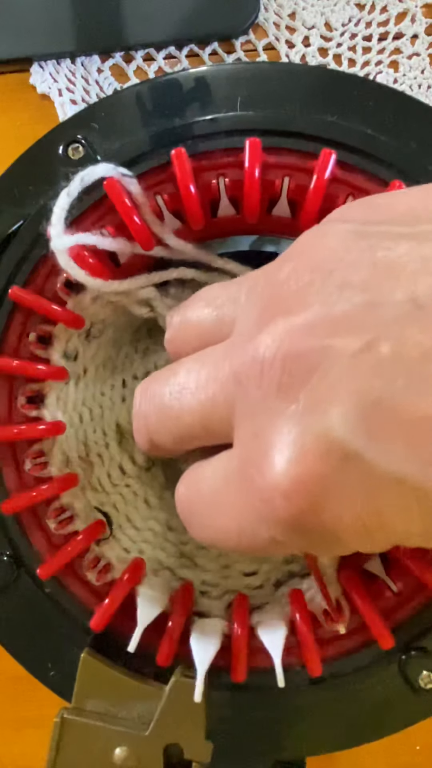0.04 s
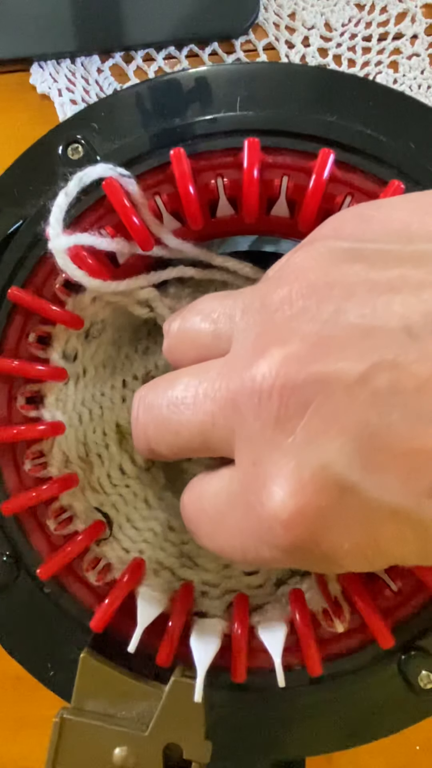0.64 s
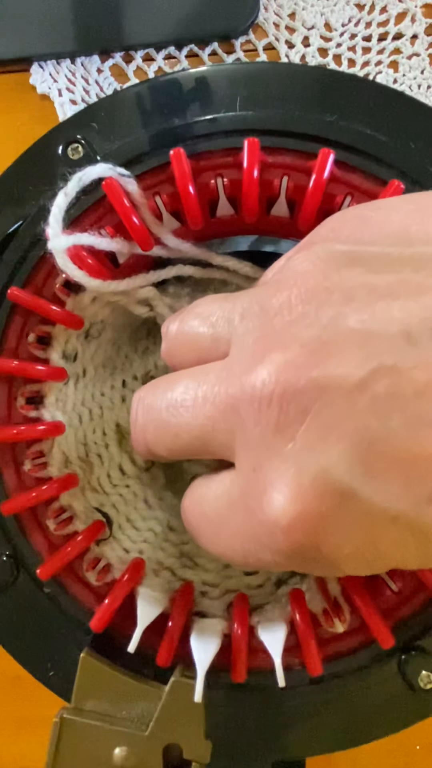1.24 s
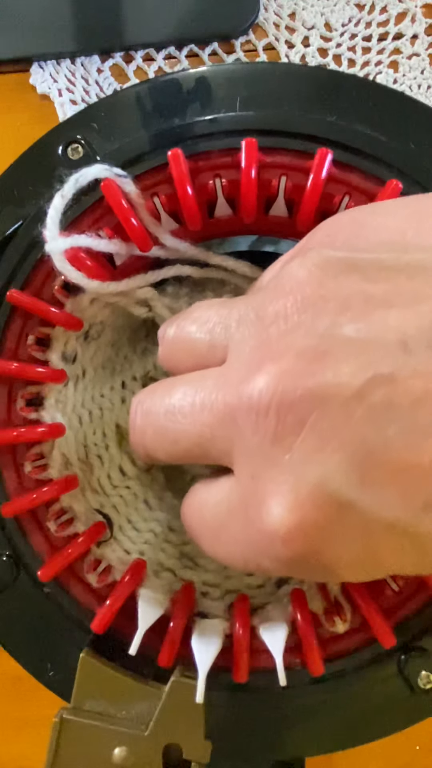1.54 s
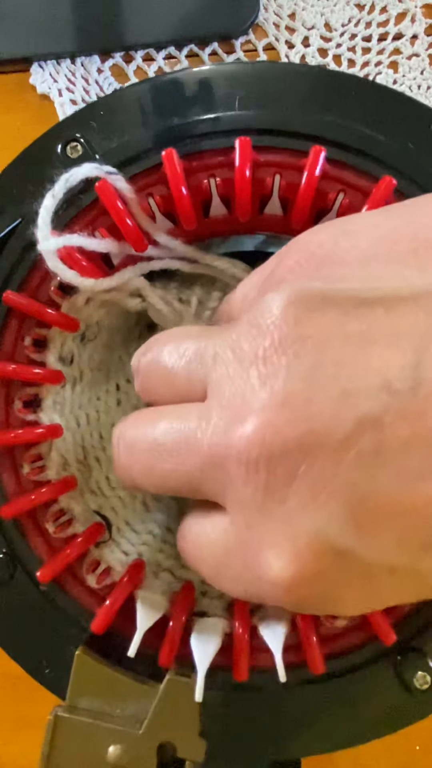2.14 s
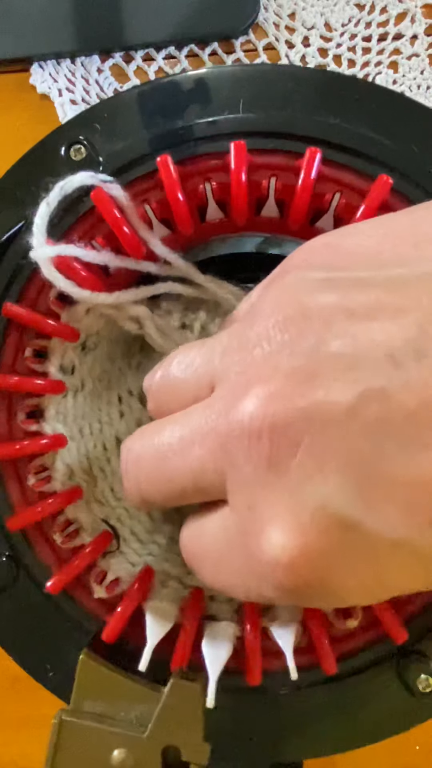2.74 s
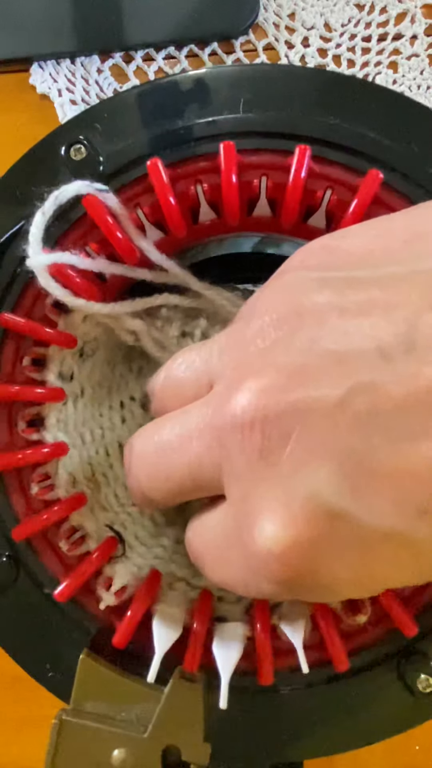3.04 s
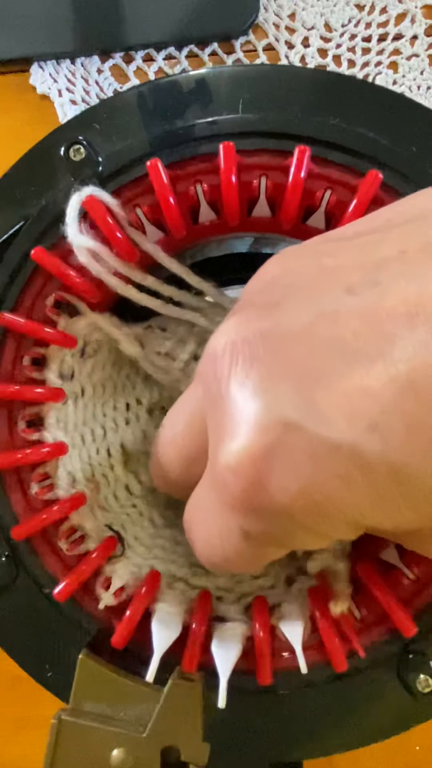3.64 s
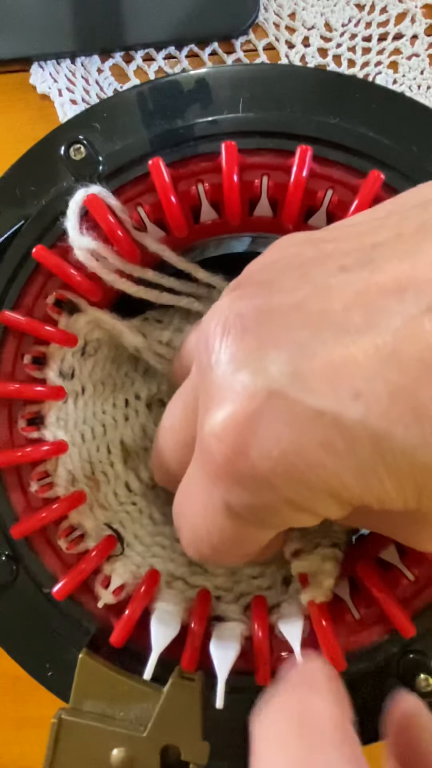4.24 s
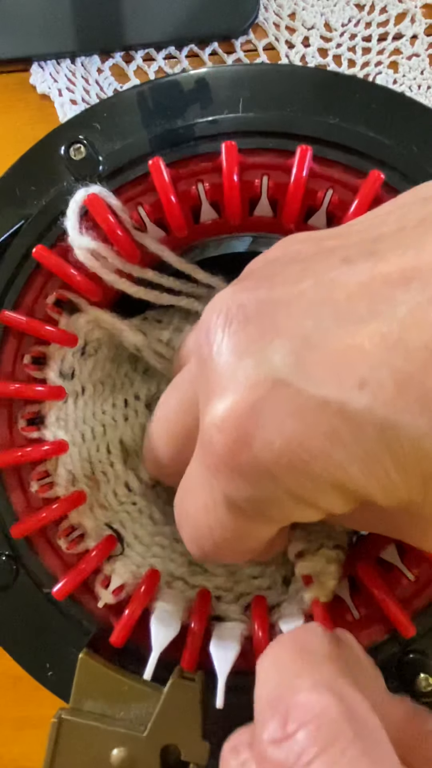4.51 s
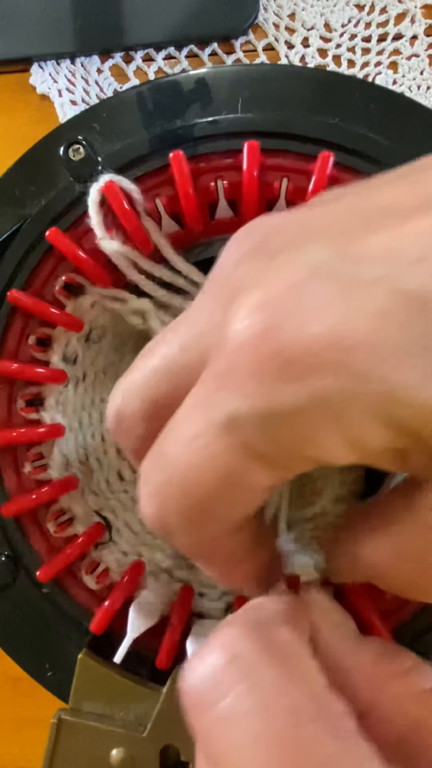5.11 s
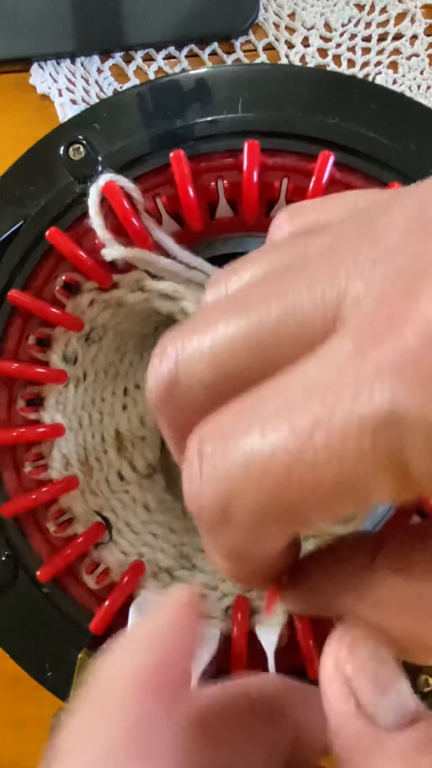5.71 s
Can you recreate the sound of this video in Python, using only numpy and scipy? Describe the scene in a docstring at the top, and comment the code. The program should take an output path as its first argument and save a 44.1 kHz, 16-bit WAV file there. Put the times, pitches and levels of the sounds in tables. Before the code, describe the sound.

Plastic knitting machine needles click and snap irregularly as yarn is pulled off the pegs, with soft ticks and rustles, close up.

```python
"""Hands lift stitches off a plastic circular knitting machine on a table, close up in a small room.
First, light needle clicks and yarn ticking over the pegs. From 1.5 to 2.8 s needles snap hard in their
slots and the ring knocks, then chatters, on the hollow housing, whose low modes hum on. Softer ticks
follow; pulled yarn drags and wool hisses. Near 4.8 s taut yarn creaks and the ring chatters again.
A few clicks and faint pulls end the scene at 5.8 s."""
import sys
import numpy as np
from scipy import signal
from scipy.fft import rfft, irfft
from scipy.io import wavfile

SR = 44100
rng = np.random.default_rng(int(sys.argv[2]) if len(sys.argv) > 2 else 0)


def file_out(sig):
    """Save sig as 16-bit WAV at sys.argv[1]."""
    # one column per channel
    cols = np.atleast_2d(sig).T
    # limit, then scale
    lim = np.clip(cols, -1, 1)
    pcm = np.round(lim * 32767).astype(np.int16)
    wavfile.write(sys.argv[1], SR, pcm)


N = 254456

# Needles and ring striking the housing.
# Each row: time in seconds, strength in dB, hardness 0-1, part passed to the housing in dB.
NEEDLE_CLICKS = [(.002, -43.5, 0.51, 0.5), (0.2069, -42.5, .4, -13.5), (.534, -43, 0.27, -14),
                 (1.494, -42, 0.4, 4.5), (1.506, -29, 0.17, -3.5), (1.536, -48, 0.83, -28),
                 (1.7872, -28.5, 0.18, -7), (1.816, -37.5, 0.23, 3), (1.848, -36, 0.13, -16),
                 (1.927, -41, 0.88, -16), (1.958, -41, 0.79, -23), (2.009, -25.5, 1, -23.5),
                 (2.069, -48.5, 0, 5), (2.167, -69.5, 1, 3), (2.473, -45.5, 0.02, -8.5),
                 (2.549, -44.5, 0.2, -8.5), (2.611, -20.5, 0.52, -9.5), (2.6636, -32.5, 0.4, -12),
                 (2.744, -26, 0.4, -3.5), (3.106, -42, 0.89, -8), (3.289, -49.5, 0.33, -3.5),
                 (3.353, -54, 0.3, -1.5), (3.442, -51.5, .35, -1), (3.5967, -39.5, 0.99, -8.5),
                 (3.767, -49.5, 0.3, 3.5), (4.38, -50, 0.64, -15.5), (4.391, -50, 0.53, -23),
                 (4.401, -50.5, 0, -8), (4.7298, -35.5, 0.5, -8.5), (4.86, -44.5, 0.76, -20.5),
                 (4.9959, -40.5, 0.96, -10), (5.056, -45.5, 0.67, -1), (5.071, -45.5, 0.23, -6.5),
                 (5.144, -54, 0, -10), (5.198, -56, 0.55, -16)]
# Ring chattering in its play.
# Each row: start and end in seconds, strength in dB, hardness 0-1, part passed to the housing in dB.
RING_RATTLES = [(2.616, 2.655, -37.5, 0.33, -4.5), (2.762, 2.815, -38.5, .3, -2.5),
                (4.742, 4.838, -43.5, 0.77, -11.5)]
# Yarn slipping over a peg. Each row: time in seconds, strength in dB, tension 0-1.
YARN_SLIPS = [(0.2952, -44, 0.4), (0.3391, -45, 0.4), (0.3838, -46, 0.31), (0.4105, -48, .35),
              (0.5133, -44, 0.47), (0.87, -50, 0.22), (1.2213, -45.5, .45), (1.3559, -47, .42),
              (1.4027, -53, .2), (1.477, -43, .35), (1.6372, -53.5, .12), (1.756, -47, .33),
              (2.0086, -28.5, 0.94), (2.26, -64, 0), (2.344, -63.5, .05), (2.464, -39, .42),
              (2.8394, -41.5, 0.2), (3.1443, -39, 0.4), (3.158, -47, 0.42), (3.207, -46, 0.23),
              (3.2756, -44.5, 0.3), (3.3747, -42, .32), (3.4631, -40, 0.37), (3.6367, -52, 0),
              (3.685, -44, 0.24), (3.8473, -50, 0.15), (3.9331, -62.5, 0), (3.964, -60, 0.29),
              (4.4867, -56.5, 0.34), (4.5646, -46.5, .05), (5.226, -59, 0), (5.4926, -55.5, 0.2),
              (5.651, -57.5, .3)]
# Yarn drawn along the plastic. Each row: start and end in seconds, drag in dB, tension 0-1.
YARN_PULLS = [(1.473, 1.519, -54.5, 0.47), (2.442, 2.472, -55.5, 0.14), (2.584, 2.675, -46.5, 0.56),
              (2.759, 2.812, -46.5, 1), (3.686, 3.792, -57.5, 0.26), (3.813, 3.893, -61, 0.33),
              (4.104, 4.152, -52, 0.27), (4.231, 4.265, -60, 0.1), (4.506, 4.55, -55, 0),
              (4.582, 4.711, -50, 0.1), (4.729, 4.837, -50.5, .95), (5.012, 5.091, -58, 0.7),
              (5.12, 5.245, -68.5, 0.67), (5.335, 5.505, -64.5, .5), (5.709, 5.77, -60, 0.63)]
# Low modes of the hollow housing. Each row: frequency in Hz, relative level in dB, T60 in seconds.
HOUSING_MODES = [(137, -5, .32), (190, -10, 0.46), (202.5, -1.5, 0.24), (255.8, -1, 0.32),
                 (291.6, -5.5, 0.38), (339.3, -1, 0.22), (454.8, -3.5, 0.21), (574, -4, 0.085)]
# Spectra of dense, quickly damped modes. Each row: frequency in Hz, relative level in dB.
THUD_SPECTRUM = [(25, -34.5), (55, -5), (110, -1), (170, 3), (260, -0.5), (400, -10.5), (700, -14),
                 (2000, -66.5)]
PLASTIC_SPECTRUM = [(300, -9.5), (450, -2), (700, 2), (1000, -7.5), (1500, -12), (1900, -12.5),
                    (2600, -11.5), (3800, -15), (5000, -10.5), (6500, -19), (9000, -13), (16000, -31)]
EDGE_SPECTRUM = [(6500, -23.5), (7500, -33.5), (8600, -7), (9700, -5), (11200, -9), (12500, -9.5),
                 (13600, -22), (15200, -13.5), (16500, -28)]
PEG_SPECTRUM = [(250, -8), (500, -1), (650, -0.5), (820, 1.5), (1200, -7), (1500, -12.5), (2300, -16),
                (3400, -28), (5500, -36), (8000, -37.5), (16000, -49)]
# Resonances of needles and ring, and of a peg held by yarn. Each row: centre and width in Hz, lift in dB.
PLASTIC_PEAKS = [(1400, 25, 5), (1760, 43, 5), (1935, 440, 2.5), (2384, 220, 3), (2537, 47, 3),
                 (3095, 400, 6.5), (4270, 110, 2), (4970, 170, 5), (5230, 190, 4.5)]
PEG_PEAKS = [(666, 110, 8), (848, 130, 4), (1130, 260, 0.5), (1740, 200, 2), (2330, 200, 9),
             (3160, 69, 7.5)]
# Spectra of parting fibres, ring reflections and room air. Each row: frequency in Hz, gain in dB.
WOOL_SPECTRUM = [(800, -12), (2500, 3), (5400, -2), (6300, -3.5), (9000, 0), (11500, -1), (13000, 1),
                 (15300, -6.5), (17000, -26.5)]
SCATTER_SPECTRUM = [(300, -24), (1000, -16.5), (2000, -11), (4500, -11.5), (8000, -15.5)]
AIR_SPECTRUM = [(25, -6), (53, -0.5), (80, -2.5), (120, -4.5), (200, -8.5), (500, -27.5), (1000, -30),
                (2000, -32), (3000, -34), (5000, -35.5), (10000, -38.5), (16000, -51)]
# Room echo. Each row: frequency in Hz, level in dB, T60 in seconds.
ROOM_BANDS = [(124, -12, 1), (239, -4.5, 0.12), (493, -14, 0.58), (990.5, -8.5, 0.16), (2050, -13, 0.36),
              (3840, -13.5, 0.3), (7800, -16, 0.053), (12000, -17.5, 0.33)]
# Balance of the two microphone ports. Each row: frequency in Hz, left minus right in dB.
PORT_BALANCE = [(100, -1.75), (250, -3), (650, -6.5), (850, 0), (1100, 7), (2000, -1.5), (2500, -3),
                (3100, -3), (4400, -7), (5000, 1.55), (16000, -1)]
# Phase between the ports. Each row: frequency in Hz, lead of the left in radians.
PORT_LEAD = [(1500, 0), (3200, .6), (4700, 0), (5500, .4), (7400, 3.1), (9800, 6.1), (11500, 6.8),
             (12800, 9), (14000, 9.7), (16000, 11.6)]

KNOCK_HZ, SNAP_HZ, EDGE_HZ, DRAG_HZ = (300, 1400), (1400, 6800), (6800, 18000), (450, 2700)
# Offsets (soft, hard): a harder contact is shorter and reaches higher modes.
KNOCK_DB, SNAP_DB, EDGE_DB = (4, -6.5), (-5, 5.5), (-28.5, -4)
# Offsets (slack, taut): slack yarn thumps, taut yarn snaps.
PEG_KNOCK_DB, PEG_SNAP_DB, PEG_HOUSING_DB = (-0.5, -21.5), (-16, 0.5), (-8.5, -32.5)
CREAK_DB, HISS_DB = (-29, 5), (-66, -43.5)


def needles():
    """Needles and ring strike plastic on plastic; higher modes die sooner."""
    times_s, db, hardness, passed_db = np.transpose(NEEDLE_CLICKS + releases() + chatter())
    hum = housing(times_s, db + passed_db - 4)
    thud = blows(times_s, db + passed_db - 6, colour(THUD_SPECTRUM),
                 rise_s=0.00087, t60_s=0.16, level_samples=1323)
    knock = blows(times_s, db + between(KNOCK_DB, hardness),
                  colour(PLASTIC_SPECTRUM, KNOCK_HZ, PLASTIC_PEAKS), rise_s=0.000097, t60_s=0.029)
    snap = blows(times_s, db + between(SNAP_DB, hardness),
                 colour(PLASTIC_SPECTRUM, SNAP_HZ, PLASTIC_PEAKS), rise_s=0.0027, t60_s=0.016)
    edge = blows(times_s, db + between(EDGE_DB, hardness),
                 colour(EDGE_SPECTRUM, EDGE_HZ), rise_s=0.00095, t60_s=0.019)
    return hum + thud + knock + snap + edge


def releases(heavy_db=-32.5, lead_s=0.0035, offset_db=-8.5, hardness=0.9):
    """Click rows: a needle lets go with a small hard tick before each heavy blow."""
    return [(time_s - lead_s, db + offset_db, hardness, passed_db)
            for time_s, db, _, passed_db in NEEDLE_CLICKS if db > heavy_db]


def chatter(gap_s=0.018, jitter_s=0.002, spread_db=0.7, max_hits=8):
    """Click rows: the ring rattles unevenly in its play."""
    clicks = []
    for start_s, end_s, db, hardness, passed_db in RING_RATTLES:
        deviations = rng.standard_normal((max_hits, 2))
        for time_s, (late, louder) in zip(np.arange(start_s, end_s, gap_s), deviations):
            clicks.append((time_s + jitter_s * late, db + spread_db * louder, hardness, passed_db))
    return clicks


def housing(times_s, levels_db, rise_s=0.002, spread_db=2):
    """The hollow shell hums after each blow, a little differently wherever it is hit."""
    t = np.arange(SR // 2) / SR
    swell = 1 - np.exp(-t / rise_s)
    modes = np.array([undb(db) * np.sin(2 * np.pi * hz * t) * decay(t, t60_s)
                      for hz, db, t60_s in HOUSING_MODES])
    weights = undb(spread_db * rng.standard_normal((len(times_s), len(modes))))
    return place(times_s, levels_db, swell * (weights @ modes), level_samples=1323)


def pegs():
    """Wool is a soft hammer: the peg rings dully, the housing hardly stirs."""
    times_s, db, tension = np.transpose(YARN_SLIPS + hops())
    knock = blows(times_s, db + between(PEG_KNOCK_DB, tension),
                  colour(PEG_SPECTRUM, KNOCK_HZ, PEG_PEAKS), rise_s=0.00046, t60_s=0.03)
    snap = blows(times_s, db + between(PEG_SNAP_DB, tension),
                 colour(PEG_SPECTRUM, SNAP_HZ, PEG_PEAKS), rise_s=0.0004, t60_s=0.027)
    return knock + snap + housing(times_s, db + between(PEG_HOUSING_DB, tension))


def hops(per_pull=2, offset_db=-2, spread_db=3.5, tension=0.3):
    """Slip rows: running yarn hops off a peg at random moments of each pull."""
    return [(rng.uniform(start_s, end_s), rng.normal(db + offset_db, spread_db), tension)
            for start_s, end_s, db, _ in YARN_PULLS for _ in range(per_pull)]


def yarn(hiss_db_per_drag_db=0.34):
    """Pulled yarn drags on the pegs, creaks the needles when taut and hisses as fibres part."""
    _, _, drag_db, tension = np.transpose(YARN_PULLS)
    creak_db = drag_db + between(CREAK_DB, tension)
    hiss_db = hiss_db_per_drag_db * drag_db + between(HISS_DB, tension)
    drag = pull_envelope(drag_db, fade_s=0.014) * stick_slip(per_s=1200, spread_db=2, decay_s=0.002)
    creak = pull_envelope(creak_db, fade_s=0.012) * stick_slip(per_s=1000, spread_db=3, decay_s=0.0014)
    hiss = pull_envelope(hiss_db, fade_s=0.06) * stick_slip(per_s=2100, spread_db=6, decay_s=0.00069)
    return (noise(drag, colour(PEG_SPECTRUM, DRAG_HZ, PEG_PEAKS))
            + noise(creak, colour(PLASTIC_SPECTRUM, SNAP_HZ, PLASTIC_PEAKS))
            + noise(hiss, colour(WOOL_SPECTRUM)))


def pull_envelope(levels_db, fade_s):
    """Strength of the pulls over time, each ramped in and out."""
    t = np.arange(N) / SR
    return sum(undb(db) * np.clip(np.minimum(t - start_s, end_s - t) / fade_s + 0.5, 0, 1)
               for (start_s, end_s, _, _), db in zip(YARN_PULLS, levels_db))


def stick_slip(per_s, spread_db, decay_s):
    """Unit-RMS envelope of fibres letting go at random times and strengths."""
    impulses = (rng.random(N) < per_s / SR) * undb(spread_db * rng.standard_normal(N)) ** 2
    power = signal.lfilter([1], [1, -np.exp(-1 / (decay_s * SR))], impulses)
    return np.sqrt(power / power.mean())


def ring_scatter(dry, samples=96):
    """About 2 ms of reflections in the curved ring reach the two ports with opposite sign."""
    paths = rng.standard_normal(samples)
    response = np.convolve(paths / np.linalg.norm(paths), colour(SCATTER_SPECTRUM))
    side = signal.fftconvolve(dry, response)[:N]
    return np.array([side, -side])


def room(dry, delay_s=0.004, rise_s=0.0023, samples=2 ** 15):
    """Diffuse echo of a small furnished room; each band has its own decay."""
    t, f = np.arange(samples) / SR, bins_hz(samples)
    centres_hz, levels_db, t60s_s = np.transpose(ROOM_BANDS)
    mid, side = rfft(rng.standard_normal((2, samples)))
    width = along([(150, 0.12), (800, 0.26), (3000, 1.0), (6000, 0.14)], f)  # Hz, side gain
    walls = np.array([mid + width * side, mid - width * side])
    onset = np.clip((t - delay_s) / rise_s, 0, 1)
    response = 0
    for selector, db, t60_s in zip(np.eye(len(centres_hz)), levels_db, t60s_s):
        band = irfft(walls * np.interp(np.log(f), np.log(centres_hz), selector))
        envelope = onset * decay(t, t60_s)
        response = response + band * undb(db) * envelope / np.linalg.norm(envelope)
    return signal.fftconvolve(dry[None], response, axes=1)[:, :N]


def air(level_db=-71.5):
    """Still room air: faint, steady, mostly low noise."""
    return noise(undb(level_db), colour(AIR_SPECTRUM))


def blows(times_s, levels_db, response, rise_s, t60_s, level_samples=441, samples=4096):
    """Each blow wakes a random mix of dense modes that build up and die away."""
    t = np.arange(samples) / SR
    envelope = (1 - np.exp(-t / rise_s)) * decay(t, t60_s)
    excitation = rng.standard_normal((len(times_s), samples)) * envelope
    bursts = signal.fftconvolve(excitation, response[None], axes=1)
    return place(times_s, levels_db, bursts, level_samples)


def place(times_s, levels_db, sounds, level_samples):
    """Mix sounds in at their times, each scaled by the RMS of its first samples."""
    out = np.zeros(N)
    for time_s, db, sound in zip(times_s, levels_db, sounds):
        rms = np.sqrt(np.mean(sound[:level_samples] ** 2))
        start = max(int(time_s * SR), 0)
        part = sound[:max(N - start, 0)]
        out[start:start + len(part)] += part * undb(db) / rms
    return out


def noise(envelope, response):
    """Enveloped white noise through a unit-energy response."""
    return signal.fftconvolve(envelope * rng.standard_normal(N), response / np.linalg.norm(response))[:N]


def colour(spectrum, band_hz=(30, 18000), peaks=(), samples=2048):
    """Minimum-phase impulse response of a band-limited spectrum with resonant peaks."""
    f = bins_hz(samples)
    peaks_db = sum(lift_db / (1 + (2 * (f - hz) / width_hz) ** 2) for hz, width_hz, lift_db in peaks)
    rolloff = np.sqrt((1 + (band_hz[0] / f) ** 8) * (1 + (f / band_hz[1]) ** 12))
    gain = undb(along(spectrum, f) + peaks_db) / rolloff
    cepstrum = irfft(np.log(gain + 1e-5))[:samples // 2]
    cepstrum[1:] *= 2
    return irfft(np.exp(rfft(cepstrum, samples)))


def along(points, f):
    """Interpolate (Hz, value) points over log frequency."""
    hz, value = np.transpose(points)
    return np.interp(np.log(f), np.log(hz), value)


def between(ends_db, share):
    """Level between its values at share 0 and 1."""
    return ends_db[0] + (ends_db[1] - ends_db[0]) * np.clip(share, 0, 1)


def bins_hz(samples):
    """FFT bin frequencies, floored at 1 Hz."""
    return np.maximum(np.fft.rfftfreq(samples, 1 / SR), 1)


def decay(t, t60_s):
    """Exponential fall of 60 dB per t60_s."""
    return np.exp(-np.log(1000) * t / t60_s)


def undb(db):
    """Decibels to gain."""
    return 10 ** (np.asarray(db) / 20)


def scene():
    """Machine, near reflections, room echo and air, in stereo."""
    machine = needles() + pegs() + yarn()
    return machine + ring_scatter(machine) + room(machine) + air()


def record(dry, cutoff_hz=16550, fft_samples=2 ** 18):
    """The two microphone ports differ in level and phase; a steep low-pass cuts the top."""
    f = bins_hz(fft_samples)
    tilt = undb(along(PORT_BALANCE, f) / 2)
    ports = np.array([tilt * np.exp(1j * along(PORT_LEAD, f)), 1 / tilt])
    heard = irfft(rfft(dry, fft_samples) * ports)[:, :N]
    return signal.sosfilt(signal.ellip(8, 0.2, 70, cutoff_hz, fs=SR, output="sos"), heard)


dry = scene()
out = record(dry)
file_out(out)
```